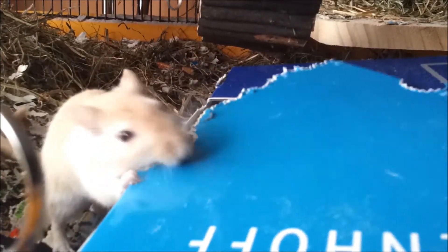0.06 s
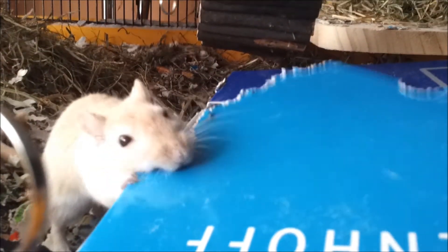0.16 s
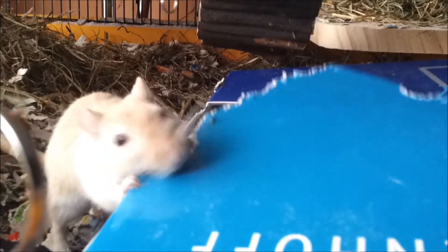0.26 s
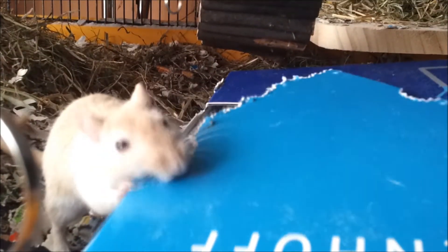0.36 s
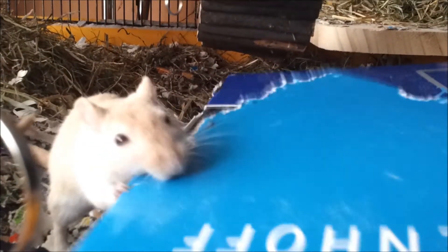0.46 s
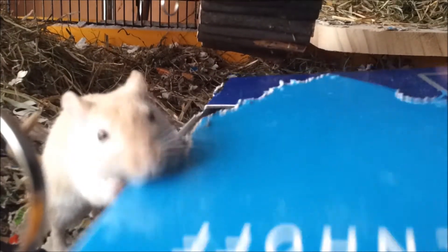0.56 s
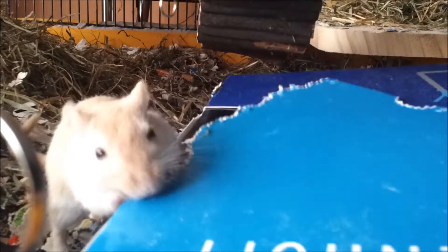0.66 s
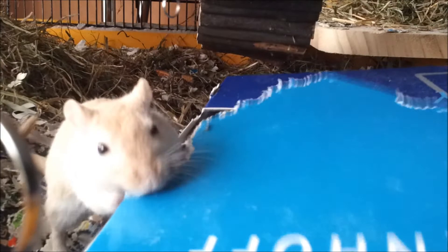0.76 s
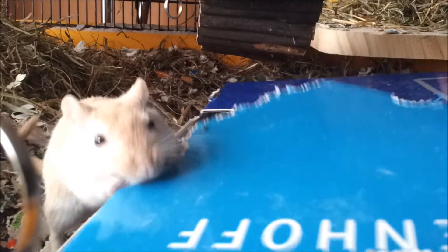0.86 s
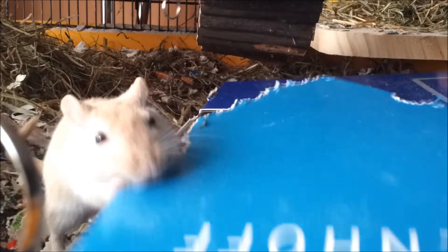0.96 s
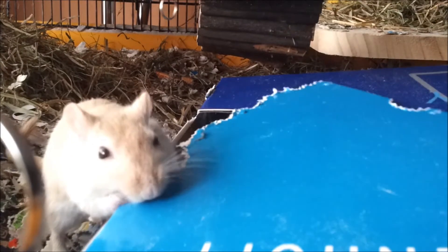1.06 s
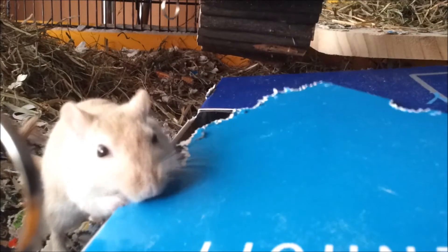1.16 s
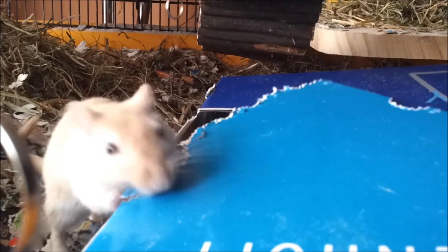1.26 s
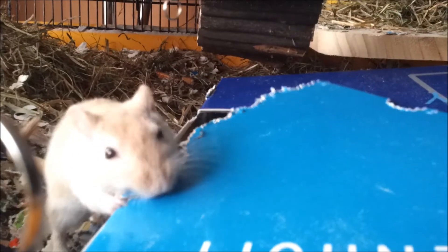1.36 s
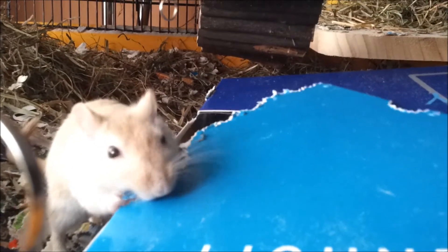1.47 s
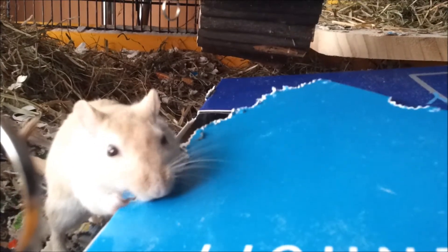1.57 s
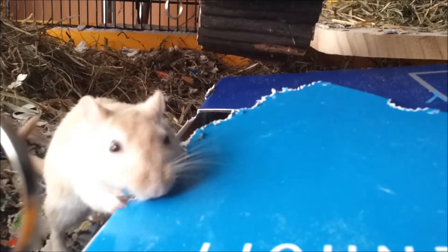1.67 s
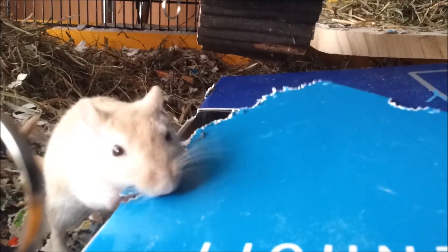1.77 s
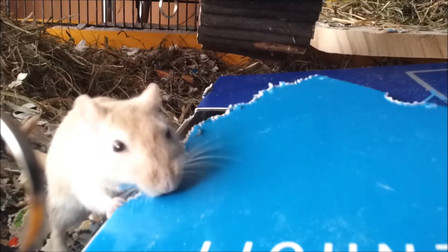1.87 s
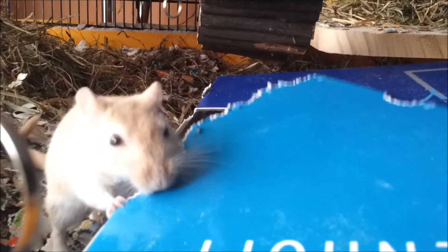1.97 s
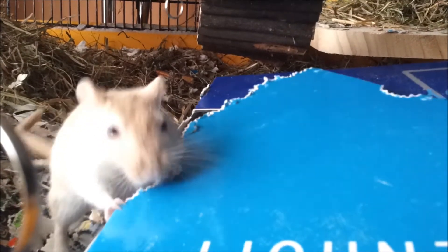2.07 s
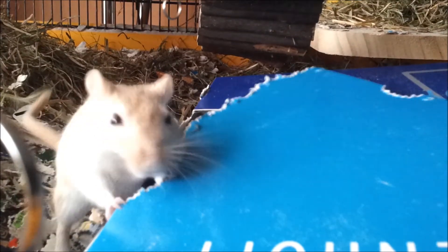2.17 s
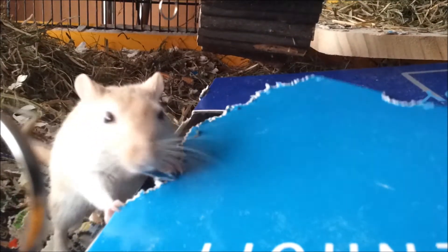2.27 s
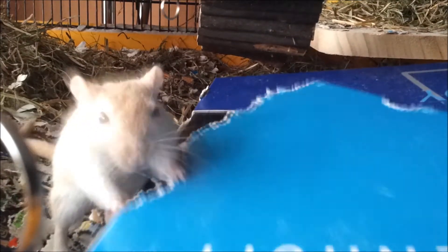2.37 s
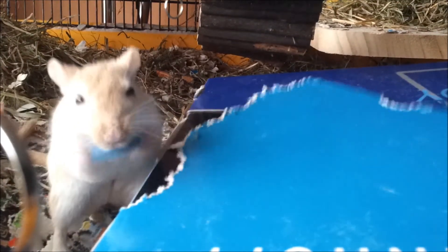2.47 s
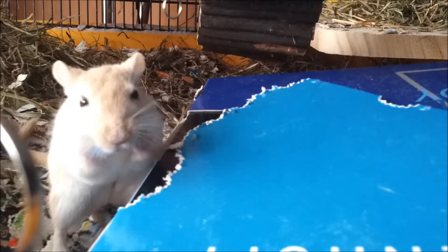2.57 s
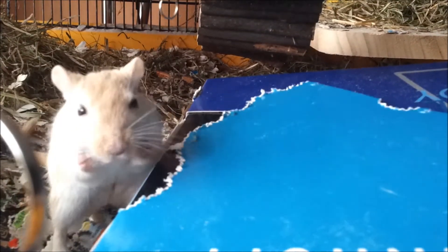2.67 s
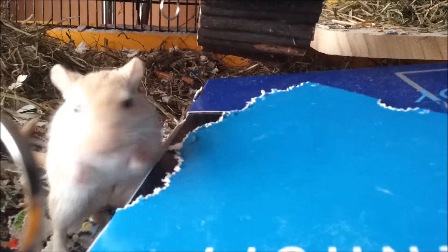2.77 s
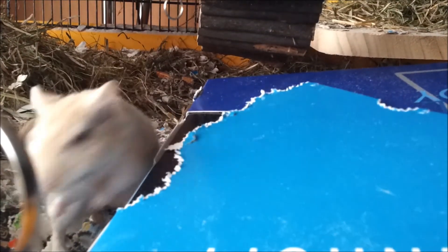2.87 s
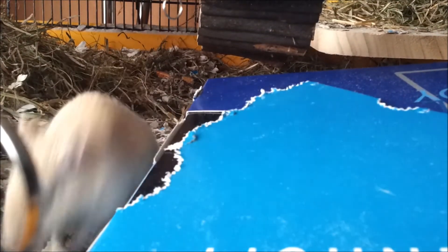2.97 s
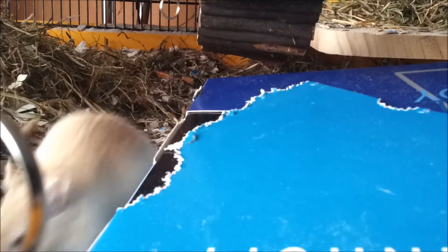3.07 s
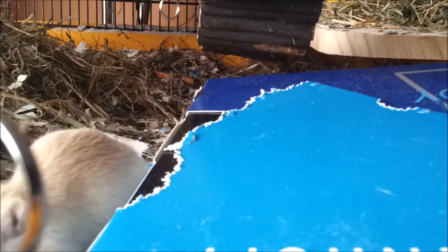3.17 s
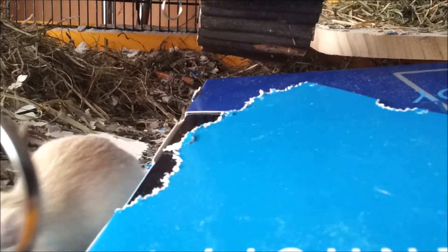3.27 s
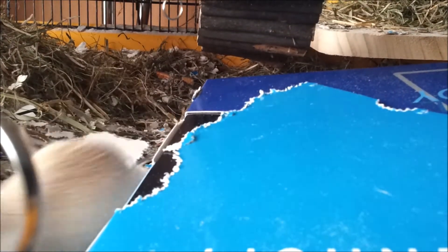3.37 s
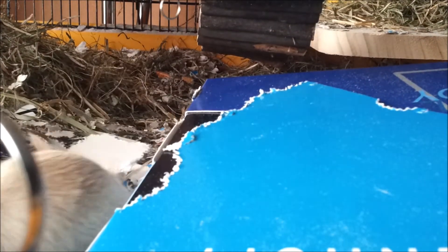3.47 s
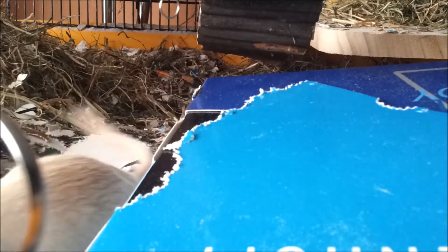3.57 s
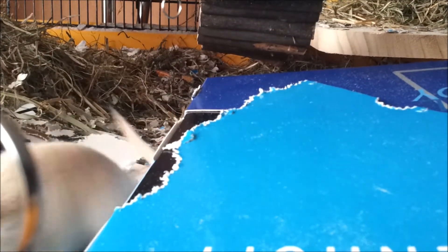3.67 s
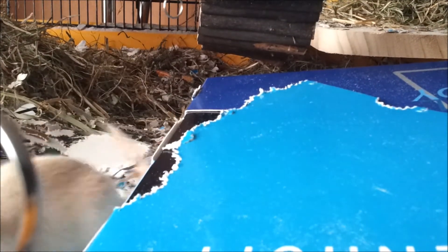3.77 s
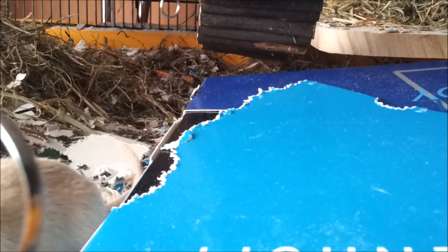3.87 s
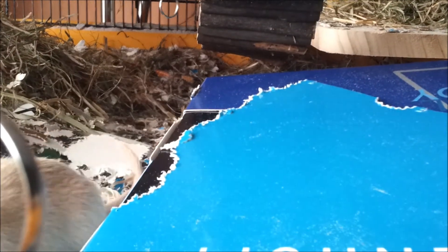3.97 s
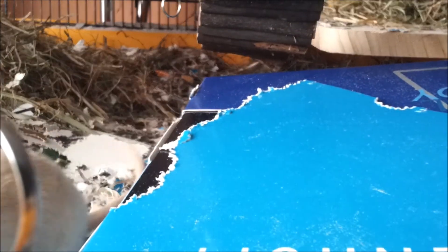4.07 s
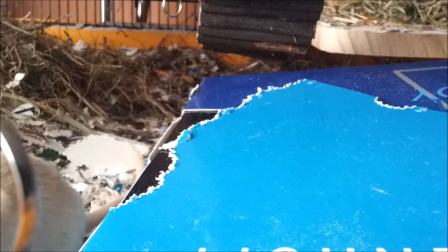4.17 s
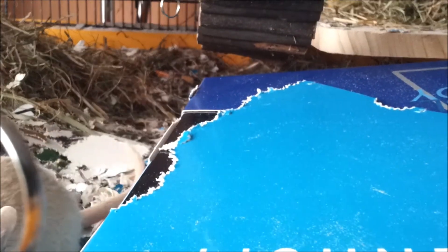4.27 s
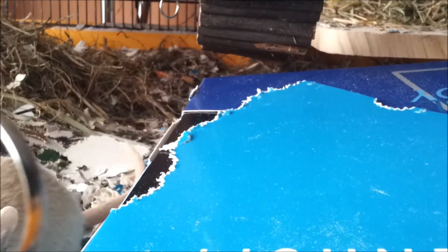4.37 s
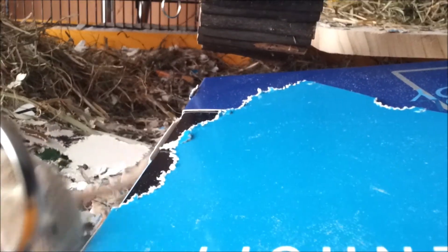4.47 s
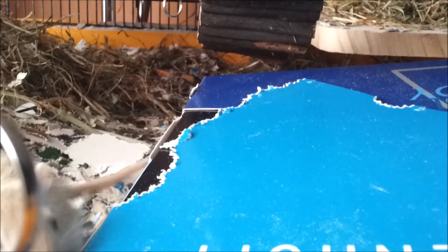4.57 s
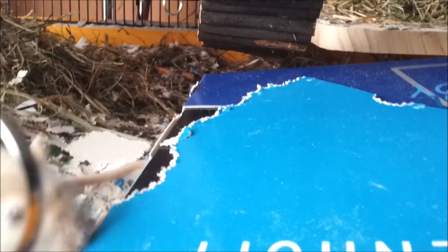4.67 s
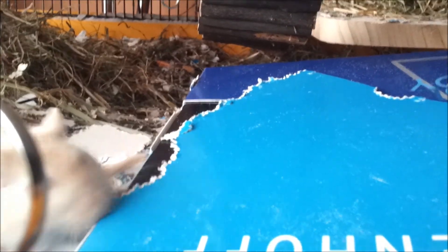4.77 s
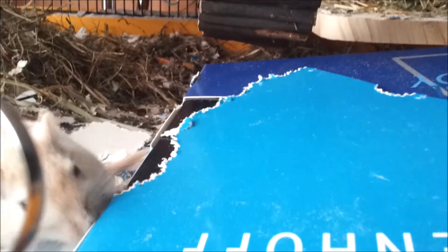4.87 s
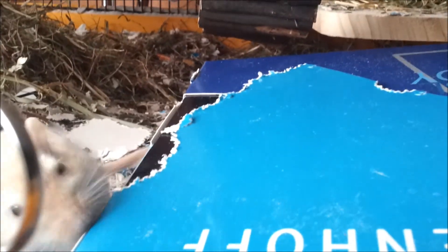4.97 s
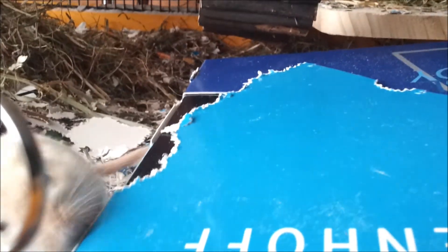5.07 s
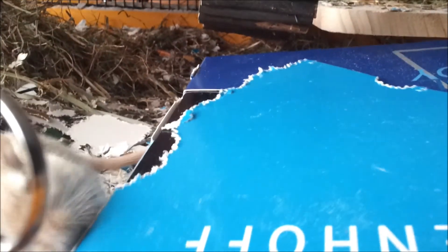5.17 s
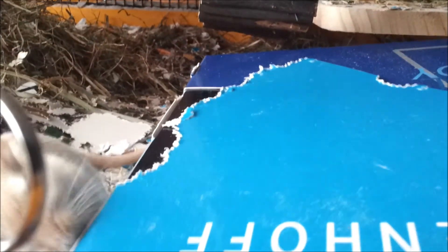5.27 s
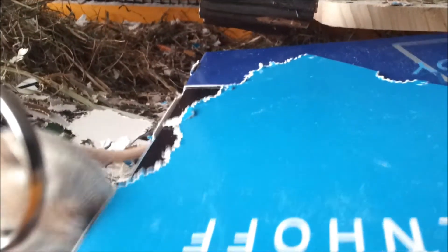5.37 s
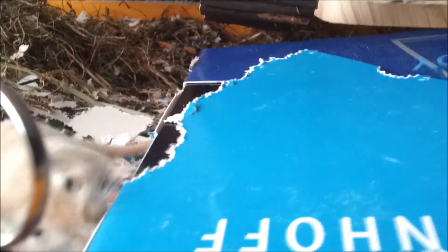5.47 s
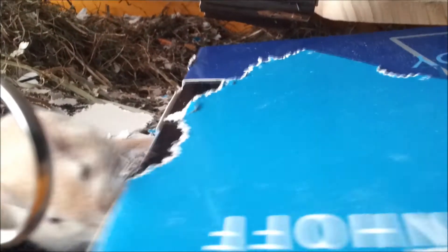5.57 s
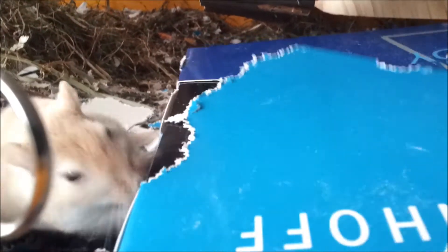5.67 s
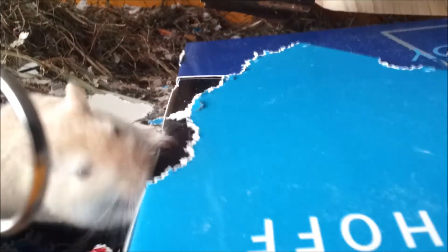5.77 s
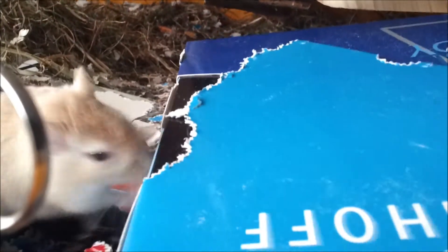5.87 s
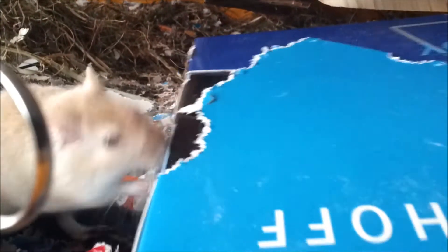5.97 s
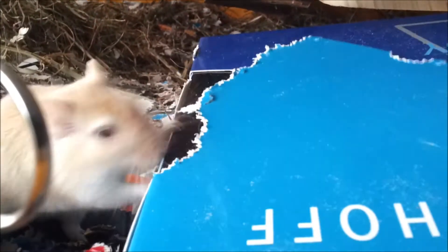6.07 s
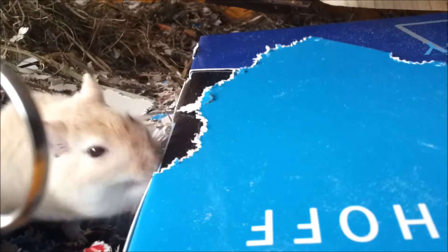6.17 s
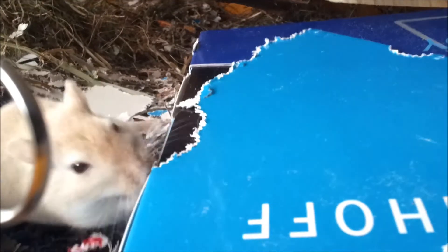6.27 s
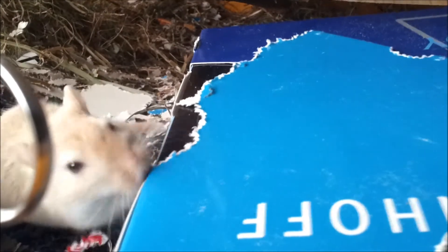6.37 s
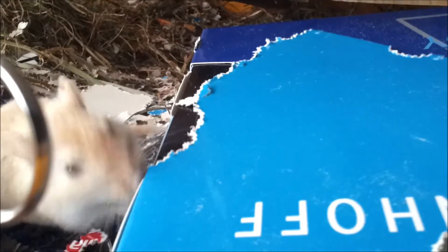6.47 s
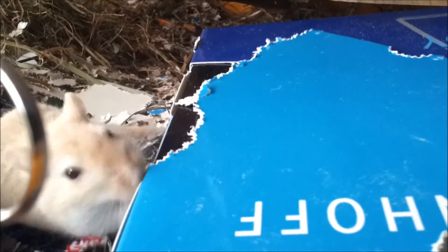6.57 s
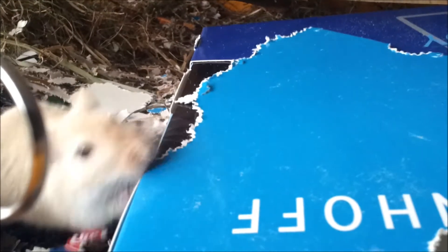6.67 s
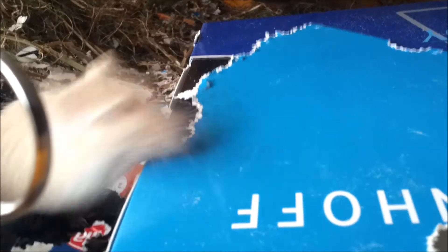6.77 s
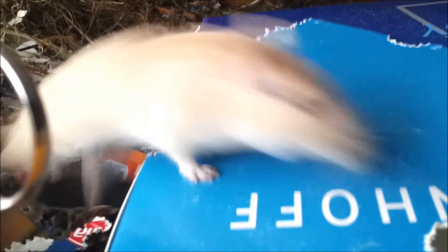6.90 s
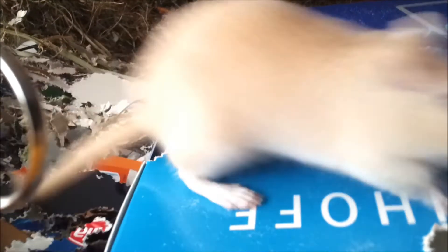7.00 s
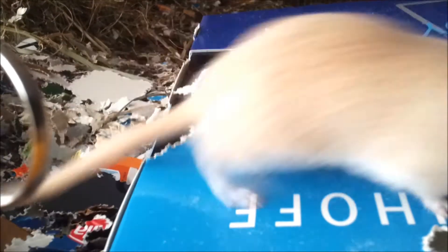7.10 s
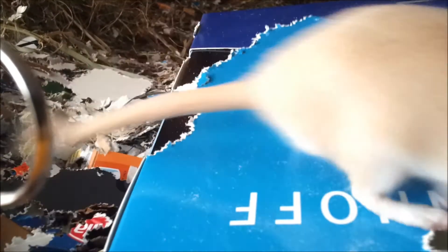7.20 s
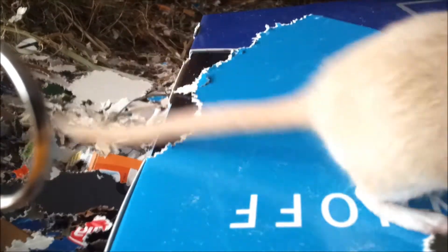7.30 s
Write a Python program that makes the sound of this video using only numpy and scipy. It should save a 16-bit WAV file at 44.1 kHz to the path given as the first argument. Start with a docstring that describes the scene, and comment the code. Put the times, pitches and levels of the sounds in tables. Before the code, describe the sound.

A gerbil gnaws the edge of a cardboard box, making irregular sharp clicks, crunches and tiny rips with a slightly hollow ring. The chewing thins out midway into soft straw rustling and a few separate snaps. Then come two quick runs of claws scrabbling through bedding, mixed with more bites. The sound is close to the microphone and slightly left, in an indoor cage with a faint room hush.

```python
"""A gerbil gnaws, tears and scratches at the edge of a cardboard box in a cage, close to a phone.
Each contact is impulse excitation: a swarm of breaking fibres cracks in the air and rings the board's modes.
Bedding rustles in between, and one tooth squeaks by stick-slip friction. The cage adds a short echo
over a faint room hush; the direct sound reaches the phone's left port first."""
import sys
import numpy as np
from scipy import signal
from scipy.fft import rfft, irfft, next_fast_len
from scipy.io import wavfile
from scipy.ndimage import uniform_filter1d

SR = 44100
rng = np.random.default_rng(int(sys.argv[2]) if len(sys.argv) > 2 else 0)


def to_wav(s):
    """Save 16-bit WAV."""
    ch = np.atleast_2d(s).T  # columns
    pcm = np.round(np.clip(ch, -1, 1) * 32767)  # PCM
    wavfile.write(sys.argv[1], SR, pcm.astype(np.int16))


N = 323694
FRAME, LEAD = 8192, 1536  # samples per contact, and before its peak
FRAME_MS = (np.arange(FRAME) - LEAD) * 1000 / SR  # time from the peak
AIR_PATH = dict(scattered=0.98, lag_samples=6, pan_db=3.5)
BOARD_PATH = dict(scattered=0.29, lag_samples=3, pan_db=1.5)


def undb(db):
    """Decibels to amplitude ratio."""
    return 10 ** (np.asarray(db) / 20)


def level(x, db):
    """Normalisation to an rms level."""
    return x * undb(db) / np.sqrt(np.mean(x ** 2))


def walk(rate):
    """Slow random modulation: values held for 1 / rate seconds and smoothed twice."""
    hold = int(SR / rate)
    steps = np.repeat(rng.standard_normal(N // hold + 1), hold)
    return uniform_filter1d(uniform_filter1d(steps, hold), hold)[:N]


def fibres(size, per_s, scatter_db):
    """Poisson impulses of either sign; a positive scatter makes a few much larger than the rest."""
    snaps = (rng.random(size) < per_s / SR) * rng.standard_normal(size)
    return snaps * undb(scatter_db * np.minimum(rng.exponential(size=size), 5))


def modes(table, size, detune=0):
    """Damped resonators, one response each; alternating signs keep the valleys of their sum shallow."""
    hz, width, db = np.array(table, float).T[:, :, None]
    hz = hz * (1 + detune * rng.standard_normal(hz.shape))
    f = np.fft.rfftfreq(size, 1 / SR)
    sign = (-1.) ** np.arange(len(table))[:, None]
    return sign * undb(db) * 1j * f * width / (hz ** 2 - f ** 2 + 1j * f * width)


def ports(push, scattered, lag_samples, pan_db):
    """Path difference: the right port gets the push later, weaker and scattered by fur and straw."""
    flip = np.sign(rng.standard_normal(len(push)))
    far = np.roll(push * (np.sqrt(1 - scattered ** 2) + scattered * flip), lag_samples)
    return np.array([push * undb(pan_db / 2), far * undb(-pan_db / 2)])


def ring(push, response, db, window):
    """Forced response, scaled so that its highest rms over `window` samples is db."""
    sound = irfft(rfft(push) * response, FRAME)
    power = uniform_filter1d(np.mean(sound ** 2, axis=0), size=window)
    return sound * undb(db) / np.sqrt(power.max())


def at_time(s, frame):
    """Time shift that puts the peak of a frame's push at s seconds."""
    start = int(s * SR)
    return np.pad(frame, ((0, 0), (start, N - start)))[:, LEAD:LEAD + N]


# The room's noise spectrum. Each row: frequency in Hz, relative spectral density in dB.
HUSH_SPECTRUM = [(15, -51), (25, -2), (59, -14), (200, 2.5), (1150, 0), (4260, -18.5), (7680, -20),
                 (12800, -16), (15000, -28)]

def room_hush():
    """Partly coherent noise: a faint, wavering hush of which the two ports share a part."""
    size = next_fast_len(N)
    hz, db = np.transpose(HUSH_SPECTRUM)
    colour = undb(np.interp(np.log(np.fft.rfftfreq(size, 1 / SR) + 1), np.log(hz), db))
    own, shared = rng.standard_normal((2, size)), rng.standard_normal(size)
    hush = irfft(rfft(own + 0.69 * shared) * colour, size)[:, :N] * undb(1.1 * walk(15))
    return level(hush * undb([[1.5], [-1.5]]), db=-52)


# Resonances of the straw, the board and the whole box.
# Each row: frequency in Hz, bandwidth in Hz, relative gain in dB.
STRAW_MODES = [(2880, 1340, -2), (4840, 2850, -2), (6600, 760, 2), (7710, 970, 0.5), (11000, 4000, -5),
               (14050, 1900, -11)]
BOARD_MODES = [(578.4, 100, 5.5), (704.5, 140, 4.5), (824, 129, 4.5), (942, 144, 2.5), (1132, 150, 6),
               (1241, 115, 0.5), (1824, 105, 6), (1932, 167, 1.5), (2530, 276, -2), (1200, 1050, -2.5)]
BOX_MODES = [(159, 186, -13.5), (213, 44, -5.5), (292, 140, -4), (337, 124, 5.5)]
# Bedding and slow chewing. Each row: time in seconds, relative straw and board levels in dB.
RUSTLE_LEVELS = [(0.0, -43.5, -37), (0.15, -47, -42.5), (0.3, -41.5, -45), (0.45, -45.5, -46),
                 (0.55, -40.5, -45), (0.63, -46.5, -45.5), (0.72, -45, -46), (0.9, -49, -50),
                 (1.0, -48, -50), (1.16, -45, -44), (1.27, -45.5, -45), (1.45, -49, -45.5),
                 (1.6, -44.5, -53.5), (1.73, -57, -50), (1.77, -49, -60), (1.88, -43.5, -44),
                 (2.03, -51, -50), (2.08, -41.5, -40), (2.2, -43, -51), (2.249, -54, -49.5),
                 (2.33, -46, -47), (2.42, -44.5, -37), (2.49, -45, -38), (2.6, -52.5, -47),
                 (2.68, -56.5, -72), (3.02, -54.5, -53), (3.17, -46.5, -49), (3.45, -46, -58),
                 (3.68, -53, -63), (3.8, -42.5, -53), (3.9, -58, -57), (4.0, -46, -52), (4.15, -48, -45.5),
                 (4.28, -43.5, -46.5), (4.38, -59, -60.5), (4.561, -42, -48.5), (4.68, -50.5, -47.5),
                 (4.93, -42, -52.5), (5.04, -45, -60), (5.1, -40, -38), (5.3, -36.5, -44.5),
                 (5.43, -41, -42), (5.55, -40, -40), (5.7, -43.5, -47.5), (5.8, -44, -48),
                 (6.02, -49, -48.5), (6.2, -45.5, -46), (6.46, -46.5, -46.5), (6.68, -47.5, -55.5),
                 (6.75, -52, -61), (6.82, -48, -50), (6.9, -56.5, -64), (7.05, -46.5, -49),
                 (7.34, -52, -59.5)]

def rustle():
    """Modulated shot noise: clumps of small crackles excite the modes of straw and card."""
    s, straw_db, board_db = np.transpose(RUSTLE_LEVELS)
    t, size = np.arange(N) / SR, next_fast_len(N)
    clumps = 1.31 * walk(50) + 0.5 * walk(200)
    straw = fibres(N, per_s=6000, scatter_db=2.2) * undb(4.2 * clumps)
    card = fibres(N, per_s=1500, scatter_db=2.5) * undb(5.7 * clumps + 1.13 * walk(30))
    faint_box = [(hz, width, db - 6.5) for hz, width, db in BOX_MODES]  # light touches hardly move it
    out = 0
    for push, table, db in ((ports(straw, **AIR_PATH), STRAW_MODES, straw_db),
                            (ports(card, **BOARD_PATH), BOARD_MODES + faint_box, board_db)):
        sound = irfft(rfft(push, size) * modes(table, size).sum(axis=0), size)[:, :N]
        out = out + level(sound, 0) * undb(np.interp(t, s, db))
    return out


def fracture(rise_ms, fall_ms, trail):
    """Fibre fracture under a swelling and fading load; gives the push on the card and on the air."""
    # a slow drag is finer, and its fibres give way in bunches
    swarm = fibres(FRAME, per_s=9000 + 1200 * rise_ms, scatter_db=2 / (1 + 0.03 * rise_ms))
    hold = int(SR / 600)
    bunches = np.repeat(rng.standard_normal(FRAME // hold + 1), hold)[:FRAME]
    swarm = swarm * undb(4 * min(rise_ms / 6, 1) * bunches)
    before_ms, falls = np.minimum(FRAME_MS, 0), np.maximum(FRAME_MS, 0) / fall_ms
    creak = min(0.11 * rise_ms, 0.15) * np.exp(before_ms / 4) * (FRAME_MS < 0)
    swell = np.exp(-(before_ms / rise_ms) ** 2) + creak
    fade = np.exp(-falls ** 2) + trail * np.exp(-falls / 2.77)  # late fibres trail off
    push = swarm * swell * fade
    clean_break = 2.2 * np.exp(-(rise_ms + fall_ms) / 4.5)  # strongest in sudden contacts
    push[LEAD] += clean_break * np.sqrt(np.sum(push ** 2))
    return push, push * np.exp(-falls / 11)  # the crack in the air stops sooner than the crushing


HARD_DB = -12  # table level that divides soft contacts from hard ones
# Resonances of the airborne crack. Each row: frequency in Hz, bandwidth in Hz, relative gain in dB.
CRACK_MODES = [(2776, 790, -4), (3300, 915, -0.5), (5250, 1380, -5.5), (6600, 610, 1), (7820, 910, 0),
               (9120, 930, -2), (10520, 1300, -5), (12800, 3500, -16.5)]
# Tearing card cracks low, scrabbled straw high. Each row: time in seconds, gain of the low crack
# modes in dB; the highest modes move the opposite way.
CRACK_BALANCE = [(0.0, 2.5), (4.8, -4), (5.1, -2.5), (6.0, -3.5), (6.2, -3.5), (6.72, -5.5), (6.78, -1),
                 (7.34, 3.5)]
# The place of contact on the edge favours the board modes near one tone.
# Each row: time in seconds, base tone in Hz, spread in octaves.
CONTACT_PLACES = [(0.12, 1840, 0.57), (0.33, 1300, 1.8), (0.67, 710, 1.3), (1.1, 880, 2.4),
                  (1.75, 950, 2.4), (1.89, 704, 1.46), (2.05, 1100, 1.8), (2.44, 1190, 0.88),
                  (3.3, 1020, 2.2), (4.0, 1100, 0.65), (4.6, 1140, 1.1), (5.45, 1090, 2.3),
                  (5.53, 610, 0.5), (5.64, 1110, 0.5), (6.1, 1220, 1.2), (7.0, 850, 1.5)]

def contact(s, crack_db, board_db, thud_db, rise_ms, fall_ms, tilt_db_per_octave, trail):
    """Modal excitation: one fracture drives crack, board and box, their modes shifting with the place."""
    tables = CRACK_MODES, BOARD_MODES, BOX_MODES
    crack, board, box = (modes(table, FRAME, detune=0.035) for table in tables)
    crack_hz, board_hz = np.array(CRACK_MODES)[:, 0], np.array(BOARD_MODES)[:, 0]
    push, crackle = fracture(rise_ms, fall_ms, trail)

    place_s, tones, spreads = np.transpose(CONTACT_PLACES)
    # the board sounds higher when the crack outweighs it
    tone_hz = np.interp(s, place_s, tones) * 2 ** (0.04 * (crack_db - board_db))
    nearness = np.exp(-np.abs(np.log2(board_hz / tone_hz)) / np.interp(s, place_s, spreads))
    scatter_db = 1 + 0.076 * max(HARD_DB - board_db, 0)  # softer touches differ more in colour
    board_gains = nearness * undb(scatter_db * rng.standard_normal(len(board)))

    tilt_db = tilt_db_per_octave * np.log2(crack_hz / 6500)
    low, high = crack_hz < 4290, crack_hz > 10000
    balance_db = (low - 1.23 * high) * np.interp(s, *np.transpose(CRACK_BALANCE))
    crack_gains = undb(2 * rng.standard_normal(len(crack)) + tilt_db + balance_db)

    in_card = ports(np.roll(push, 20), **BOARD_PATH)  # the board answers just after the crack
    sound = ring(ports(crackle, **AIR_PATH), crack_gains @ crack, crack_db, window=60)
    sound += ring(in_card, board_gains @ board, board_db, window=90)
    sound += ring(in_card, box.sum(axis=0), thud_db, window=300)
    return at_time(s, sound)


# Sudden bites and knocks. Each row: peak time in seconds, relative crack, board and box thud levels
# in dB, fall time in ms, spectral tilt of the crack in dB per octave.
BITES = [(0.033, -34, -49, -42, 2.7, -16), (0.042, -37, -49, -55, 2.1, -4),
         (0.2577, -29.5, -49, -42, 3.9, 17), (0.3318, -21.5, -27, -50, 2.4, 7),
         (0.3372, -16.5, -27, -42.5, 5, 2), (0.421, -34.5, -34.5, -55, 1.4, 4),
         (0.429, -35, -50, -52, 1.5, 4), (0.4862, -32, -41, -54, 12, 12),
         (0.498, -16.5, -35, -59, 2.1, 3.5), (0.527, -34, -31.5, -54, 4.2, 2),
         (0.5952, -37, -45, -57, 5.6, -4), (0.667, -35, -44, -42, 2, 5),
         (0.6739, -38.5, -23.5, -29, 7.9, 4), (0.7156, -27.5, -47, -47, 0.72, -1),
         (0.942, -41, -50, -58, 3.5, -2), (0.9798, -45, -36.5, -45, 4.8, -2),
         (1.0352, -31, -24, -46, 5.7, 14), (1.0516, -33, -16, -24, 5.9, 2), (1.0796, -36, -37, -41, 13, -4),
         (1.0967, -36, -33, -47, 16, -4), (1.1343, -54, -38.5, -41.5, 9, 3), (1.181, -33, -49, -51, 1.9, 6),
         (1.208, -15.5, -21.5, -44, 2.7, 7.5), (1.308, -35, -43, -63, 2.8, -1),
         (1.388, -31.5, -47, -57, 2.9, -4), (1.431, -30.5, -31, -49, 8.1, 4),
         (1.474, -30.5, -56, -67, 1.1, 2), (1.57, -17.5, -22, -56, 4.3, 5.5),
         (1.643, -34, -58, -72, 0.79, 17), (1.7089, -26.5, -32.5, -64, 2.2, 3),
         (1.7545, -6.5, -20, -43.5, 3.1, 1.5), (1.8919, -31, -20.5, -35, 8.3, 12),
         (1.9526, -20.5, -33, -44, 1.1, 8), (2.027, -36.5, -60, -55, 1.4, 7),
         (2.0541, -20.5, -19, -37.5, 3.8, 0), (2.1193, -28.5, -32.5, -50, 5.8, 3),
         (2.136, -24, -34, -61, 2.5, 5), (2.155, -24, -34, -61, 5.1, 6), (2.224, -37, -62, -69, 1.5, 10),
         (2.278, -29.5, -30.5, -63, 3.1, 5), (2.316, -39, -42, -65, 9.6, 5), (2.386, -34, -54, -60, 1.5, 2),
         (2.42, -43, -51, -58, 1.8, 5), (2.4444, -10, -14, -29, 2, 3.5), (2.4844, -33, -41, -39, 2.9, -18),
         (2.558, -41, -33.5, -41.5, 9.6, -10), (2.623, -35, -33.5, -53, 0.58, 7),
         (2.887, -41.5, -36.5, -63, 1.1, -8), (2.9363, -42, -37.5, -64, 1.4, -12),
         (2.966, -33.5, -42, -60, 4.2, -4), (2.987, -31.5, -38, -51, 8.4, 3),
         (2.9952, -32.5, -33, -57, 1.6, -6), (3.075, -36, -35, -53, 2.8, -9),
         (3.1168, -34, -41, -65, 5.8, 6), (3.1447, -32, -33, -65, 3.2, 3), (3.281, -22.5, -38, -46, 2.7, 4),
         (3.3472, -29.5, -30, -57, 2.9, -1.5), (3.392, -55, -53, -60, 1.5, 7),
         (3.421, -49, -47, -65, 0.82, 1), (3.54, -33, -36.5, -63, 11, 0.5),
         (3.625, -39, -45.5, -76, 6.6, -3), (3.717, -38, -37, -63, 5.4, 4), (3.736, -48, -40, -60, 2, 1),
         (3.778, -39, -55, -71, 2, 8), (3.801, -42, -49, -71, 5.6, 5), (3.8477, -58, -40, -43.5, 2.4, 0),
         (3.928, -39.5, -33, -64, 4.2, -10), (3.956, -43, -40, -55, 11, -9),
         (4.034, -17, -22.5, -41, 3.2, 1), (4.2114, -18.5, -16.5, -50, 2.5, -5.5),
         (4.309, -28.5, -34, -75, 1.5, 8), (4.435, -41.5, -37, -60, 1.6, -6),
         (4.487, -45, -51, -68, 18, -1), (4.523, -20.5, -23.5, -45, 2.7, -5.5),
         (4.702, -38, -31.5, -49, 1.6, -9), (4.7299, -38, -42, -52, 6.5, -6),
         (4.803, -25.5, -33.5, -67, 1.8, -9.5), (4.9287, -23, -27, -55, 4.7, -3),
         (4.972, -30, -37, -69, 4.8, 16), (5.055, -23, -34.5, -59, 2.6, 10),
         (5.165, -17, -33, -67, 3.4, 10.5), (5.449, -45, -25, -58, 3.4, 2),
         (5.5169, -24.5, -55, -53, 2.1, 5), (5.5644, -26, -45, -54, 3.3, 15),
         (5.5958, -13, -28.5, -53, 4.4, -2), (5.641, -11.5, -15, -40, 2.7, -3),
         (5.678, -26.5, -31.5, -40, 13, -1), (5.8218, -24.5, -35, -61, 3.5, 4),
         (5.8899, -30.5, -39, -77, 12, 3), (6.056, -38, -34.5, -37, 10.5, 8),
         (6.112, -33, -59, -58, 1.8, 9), (6.1462, -31.5, -47, -68, 5.2, 4),
         (6.2047, -37, -33.5, -50, 3.4, -4), (6.3202, -28.5, -49, -63, 4.5, 3),
         (6.3683, -29, -49, -51, 4.4, -3), (6.493, -23, -32.5, -57, 2, -3),
         (6.5003, -31, -39.5, -65, 23, -5.5), (6.7805, -27.5, -27.5, -41.5, 5.1, -7.5),
         (6.8028, -21, -26.5, -40, 2.5, 3.5), (6.939, -27.5, -33, -45.5, 1.9, 9),
         (6.987, -33, -36, -48, 6.9, 7), (7.0617, -28.5, -31, -41, 2.8, 4.5),
         (7.087, -37, -47, -56, 1.4, 5), (7.114, -39, -39.5, -49.5, 5.2, 6)]

def bites():
    """Impulsive loading: teeth break the card abruptly, and the hardest bites break it faster."""
    out = 0
    for s, crack_db, board_db, thud_db, fall_ms, tilt in BITES:
        rise_ms = 1.3 * undb(-0.2 * max(crack_db - HARD_DB, 0))
        out += contact(s, crack_db, board_db, thud_db, rise_ms, fall_ms, tilt, trail=0.28)
    return out


# Scrapes. Each row: peak time in seconds, relative crack and board levels in dB, rise time in ms.
SCRAPES = [(0.1239, -18, -21.5, 4.2), (0.362, -33, -37, 5), (0.56, -29, -39.5, 14.3),
           (0.629, -51, -40, 3.3), (0.644, -43, -42, 3.6), (0.798, -37, -39, 3.2), (0.194, -54, -33, 4.9),
           (0.263, -31.5, -39, 9.1), (0.8532, -36, -34.5, 9.3), (1.006, -35, -33, 5.5),
           (1.299, -32, -36, 6.2), (1.5498, -46, -32.5, 7.4), (1.902, -20.5, -24.5, 8.2),
           (2.1653, -26, -29, 5.5), (2.207, -31, -37, 4), (2.284, -35.5, -31.5, 4.8),
           (2.461, -31, -23, 13.5), (2.476, -32.5, -31, 7.7), (2.523, -38, -37.5, 8),
           (2.7055, -55, -39.5, 12), (2.7548, -50, -39.5, 6.1), (2.8157, -44, -43, 7.1),
           (3.272, -29, -42, 3.8), (3.2942, -22.5, -23.5, 6.4), (4.1008, -57, -36.5, 1.8),
           (4.288, -52, -39.5, 10), (4.631, -37.5, -38.5, 3.6), (4.8885, -29.5, -38, 3.7),
           (5.131, -25, -30, 5.5), (5.191, -34.5, -36, 15), (5.318, -28, -29, 4.5),
           (5.458, -18.5, -21.5, 14.1), (5.5259, -38, -30.5, 6.5), (5.751, -35.5, -32.5, 5.9),
           (5.847, -26.5, -35.5, 8.9), (5.9418, -30.5, -60, 14), (6.069, -32, -29, 3.2),
           (6.1, -30.5, -47, 6.8), (6.157, -30.5, -29, 2.4), (6.173, -28.5, -42, 13),
           (7.0118, -38, -29, 5.2), (7.206, -33.5, -36, 5.4)]

def scrapes():
    """Gradual loading: a drag over the card swells to a peak and fades a little faster."""
    return sum(contact(s, crack_db, board_db, thud_db=board_db - 19, rise_ms=rise_ms,
                       fall_ms=0.85 * rise_ms, tilt_db_per_octave=-1.5, trail=0.18)
               for s, crack_db, board_db, rise_ms in SCRAPES)


# Resonances of the squeak. Each row: frequency in Hz, bandwidth in Hz, relative gain in dB.
SQUEAK_MODES = [(3840, 240, 3.5), (4750, 400, -8), (2000, 190, -3.5)]

def tooth_squeak():
    """Stick-slip friction: a tooth slides over the glossy face and excites a few narrow resonances."""
    slips = fibres(FRAME, per_s=11000, scatter_db=-8) * np.exp(-(FRAME_MS / 6.5) ** 2)
    push = ports(slips, scattered=0.29, lag_samples=6, pan_db=3.5)
    return at_time(0.562, ring(push, modes(SQUEAK_MODES, FRAME).sum(axis=0), db=-25, window=90))


# Paw strokes. Each row: peak time in seconds, relative crack and board levels in dB.
PAW_STROKES = [(4.918, -30, -68), (5.005, -30, -37.5), (5.085, -22, -28.5), (5.1609, -25.5, -55),
               (5.2136, -30, -32.5), (5.246, -25, -40), (5.2923, -26.5, -27.5), (5.331, -25.5, -32.5),
               (5.372, -25.5, -46), (5.4155, -26.5, -34.5), (5.492, -23.5, -46), (6.2327, -28, -40),
               (6.274, -26, -43.5), (6.3557, -24.5, -34.5), (6.406, -29, -49), (6.449, -25, -38.5),
               (6.527, -26, -42), (6.5763, -29.5, -44.5), (6.6136, -27.5, -40), (6.6576, -30, -45),
               (6.696, -30.5, -46)]

def paw_strokes():
    """Repeated excitation: claws sweep through the bedding in runs of about 24 strokes a second."""
    return sum(contact(s, crack_db, board_db, thud_db=board_db - 24, rise_ms=11,
                       fall_ms=9, tilt_db_per_octave=-0.7, trail=0.08)
               for s, crack_db, board_db in PAW_STROKES)


def cage_echo(x, bass_t60_s=0.12, echo_db=-8.5):
    """Reverberation: a short, dense exponential tail, different at each port and longer in the bass."""
    t = np.arange(SR // 4) / SR
    noise = rng.standard_normal((2, len(t)))
    low = signal.lfilter(*signal.butter(N=1, Wn=1800, fs=SR), noise)
    tail = low * undb(-60 * t / bass_t60_s) + (noise - low) * undb(-60 * t / (0.47 * bass_t60_s))
    tail = tail * (t > .0004)
    tail = tail * undb(echo_db) / np.sqrt((tail ** 2).sum(axis=1, keepdims=True))
    return signal.fftconvolve(x, tail, axes=1)[:, :N]


def scene():
    """Superposition: the gerbil to the left of the phone, its echo in the cage and the room's hush."""
    direct = bites() + scrapes() + paw_strokes() + rustle() + tooth_squeak()
    return undb(2) * (direct + cage_echo(direct)) + room_hush()


def record(dry):
    """Notch filtering and band limiting: the ports dip the low treble; the phone clips and cuts the top."""
    right_only = np.array([[0], [1.3]])  # above 1, the band inverts as it weakens
    dry = dry - right_only * signal.lfilter(*signal.iirpeak(2470, Q=9.3, fs=SR), dry)
    dry = dry - 1.5 * signal.lfilter(*signal.iirpeak(4290, Q=25, fs=SR), dry)
    low_pass = signal.ellip(12, .5, 95, Wn=14800, fs=SR, output="sos")
    return signal.sosfilt(low_pass, np.clip(dry, -1, 1))


dry = scene()
out = record(dry)
to_wav(out)
```